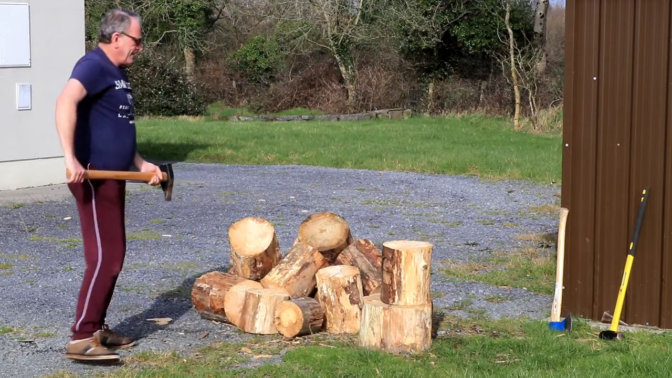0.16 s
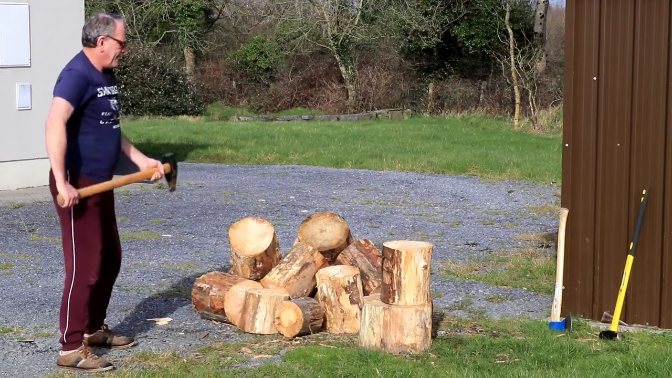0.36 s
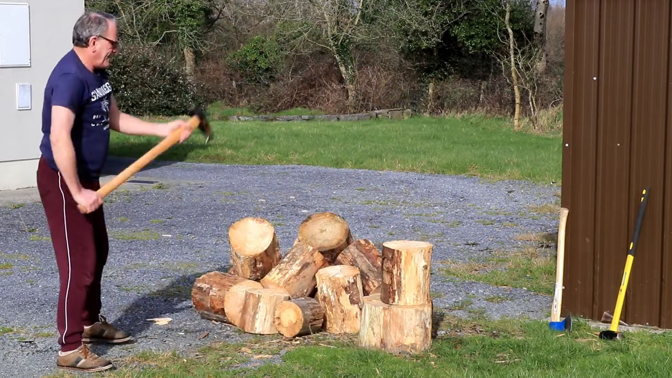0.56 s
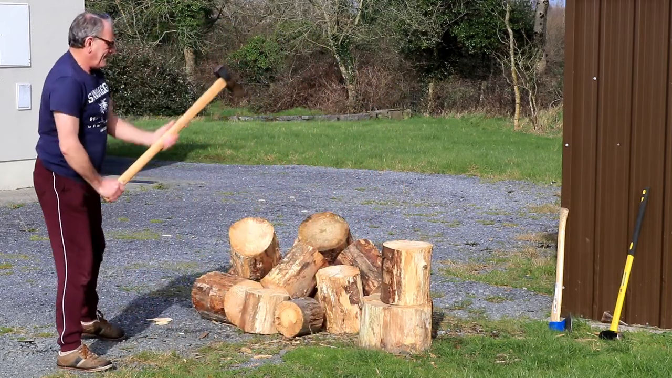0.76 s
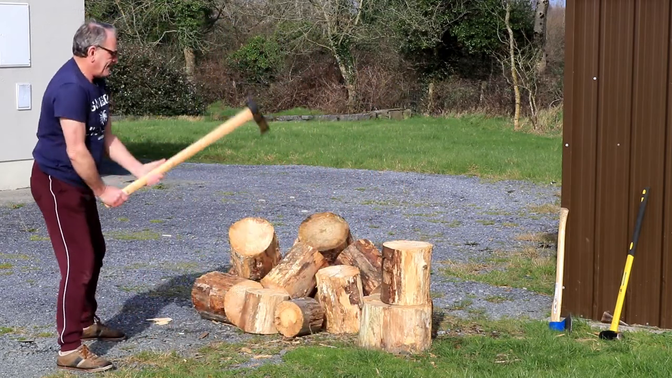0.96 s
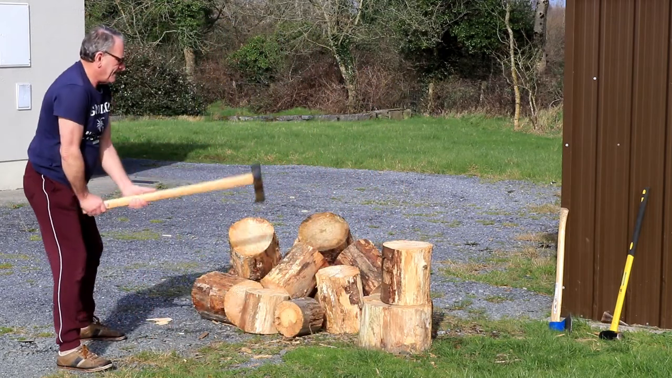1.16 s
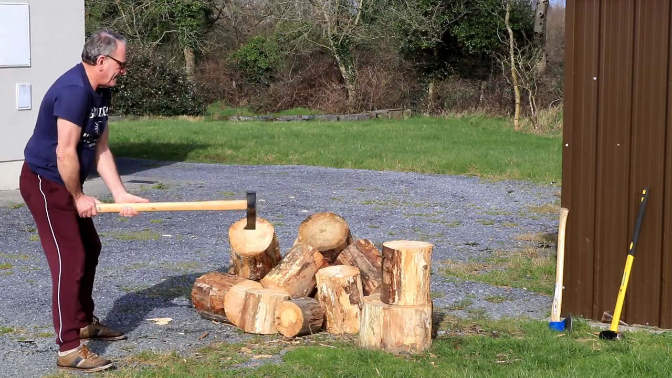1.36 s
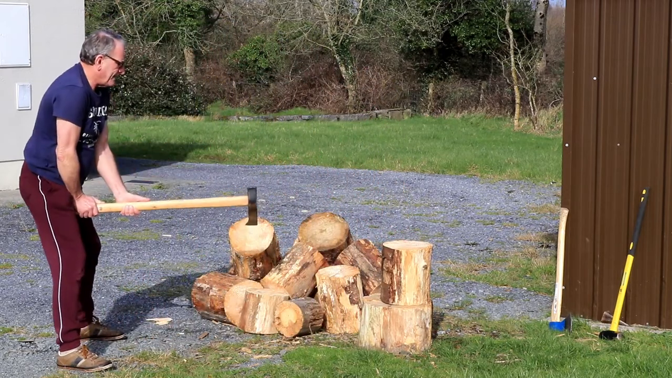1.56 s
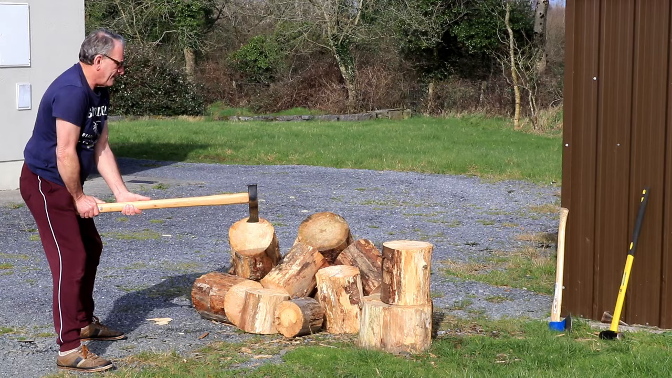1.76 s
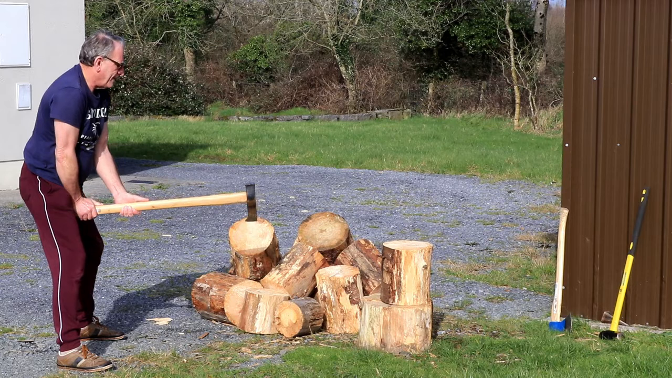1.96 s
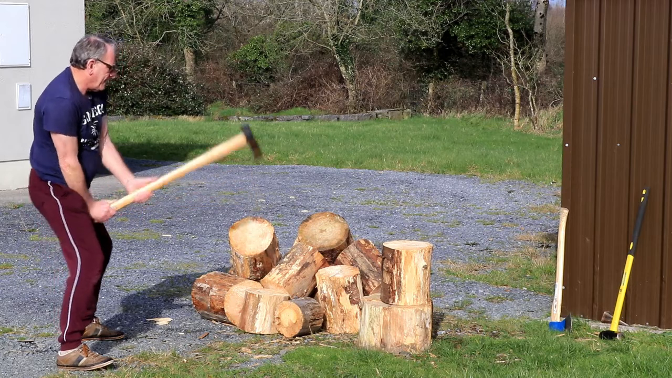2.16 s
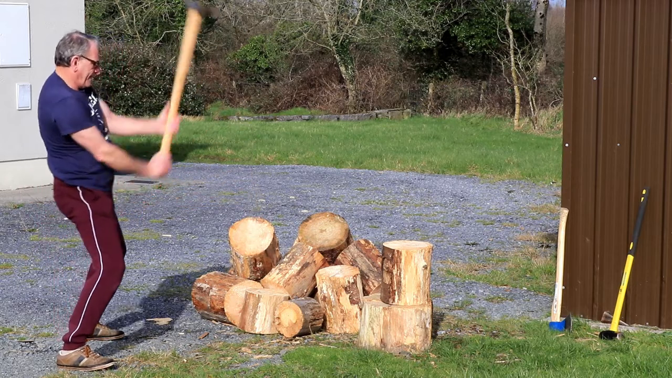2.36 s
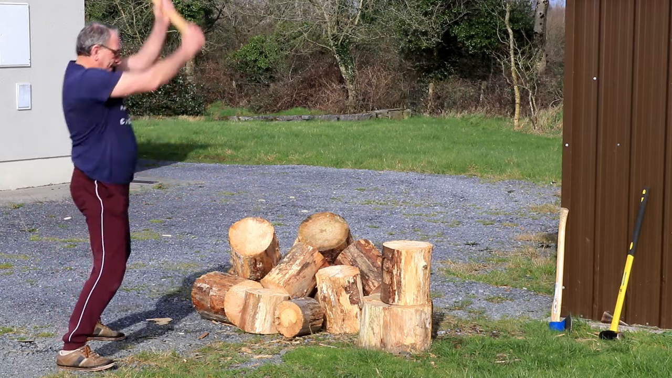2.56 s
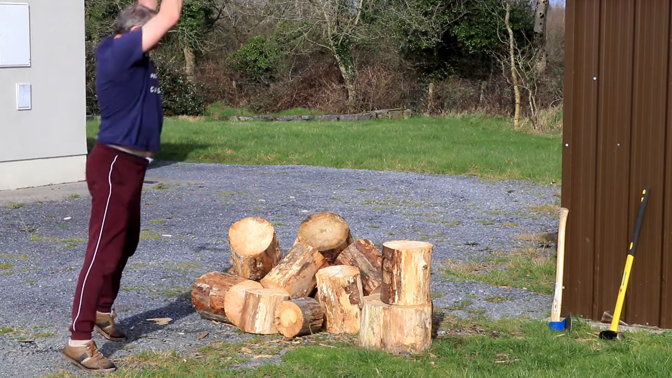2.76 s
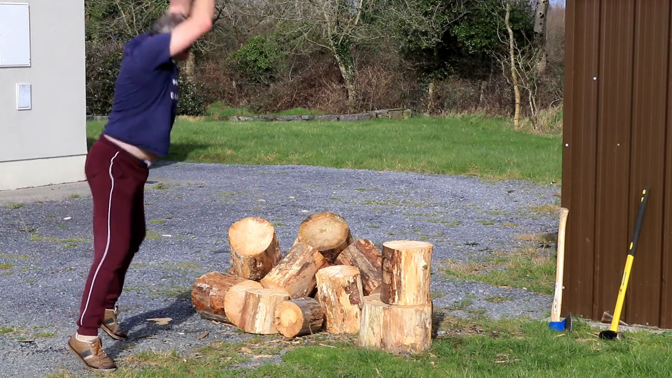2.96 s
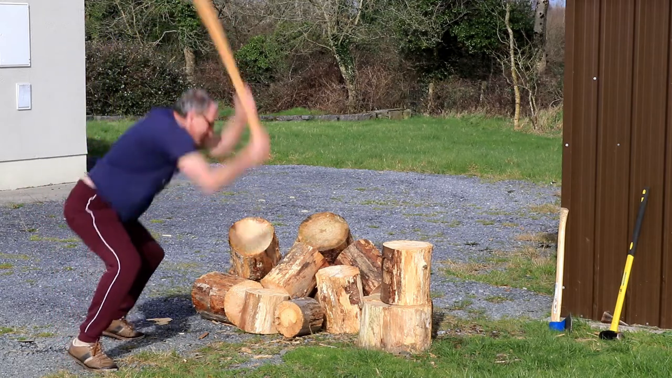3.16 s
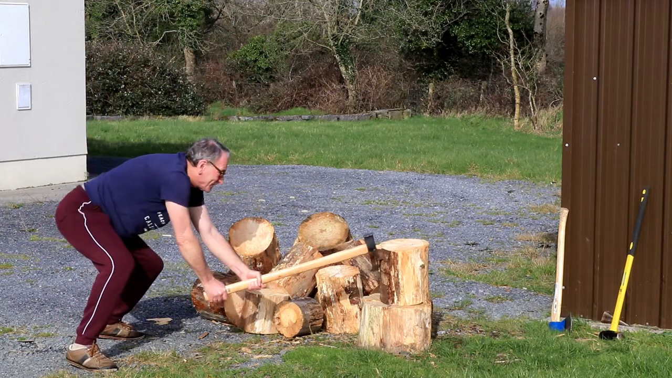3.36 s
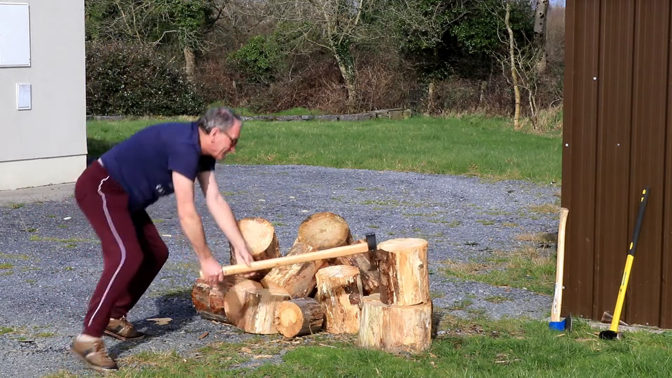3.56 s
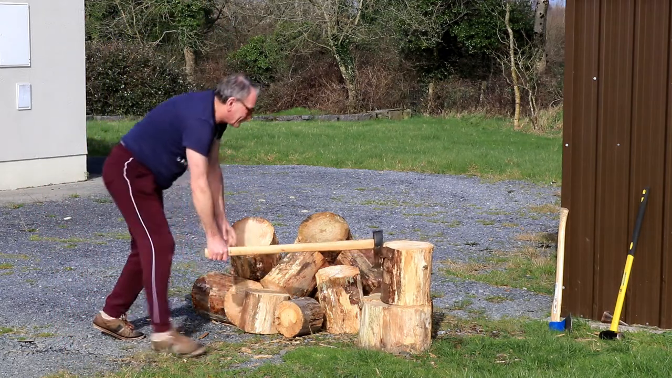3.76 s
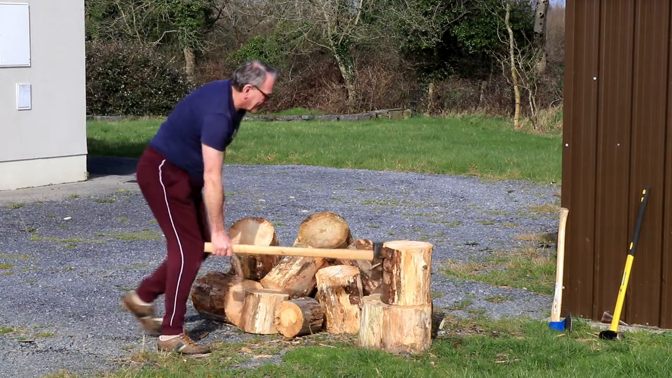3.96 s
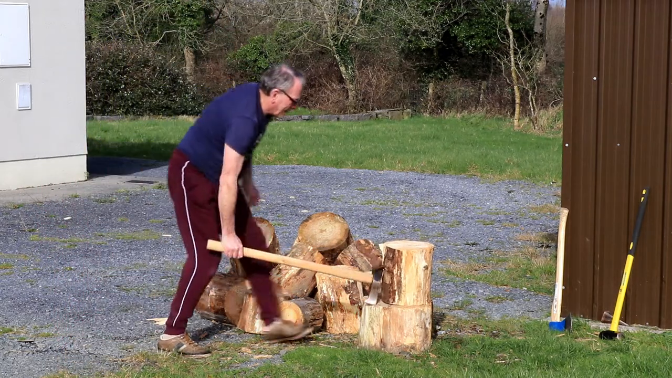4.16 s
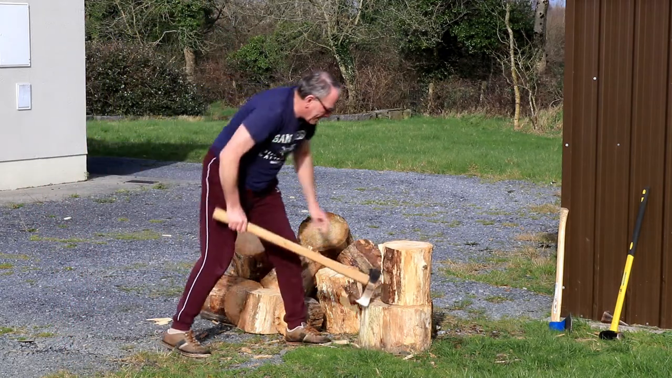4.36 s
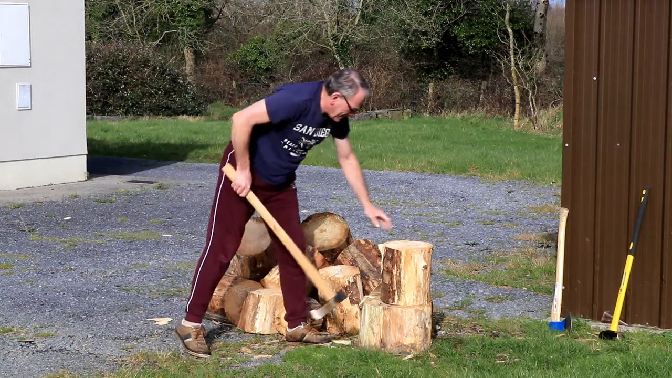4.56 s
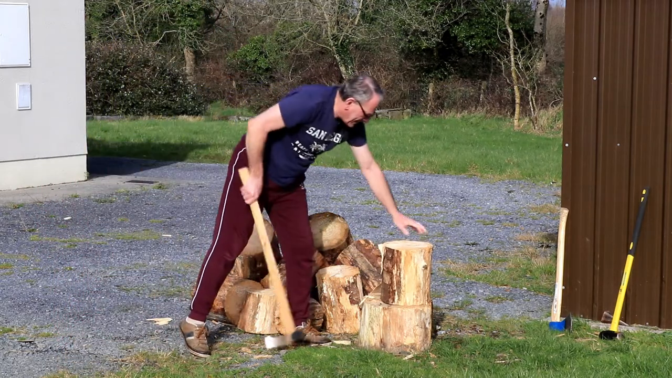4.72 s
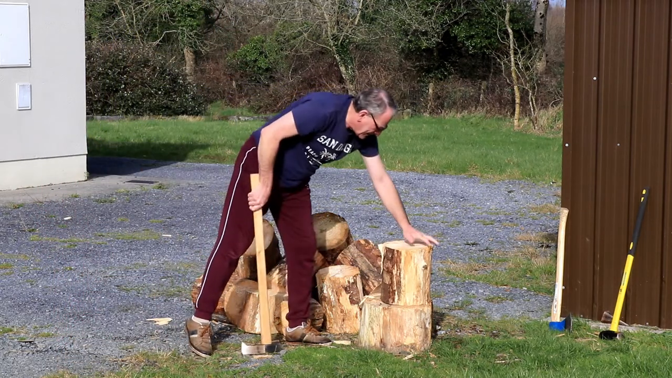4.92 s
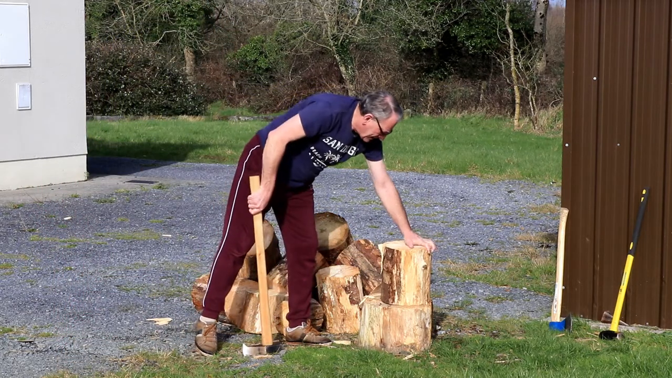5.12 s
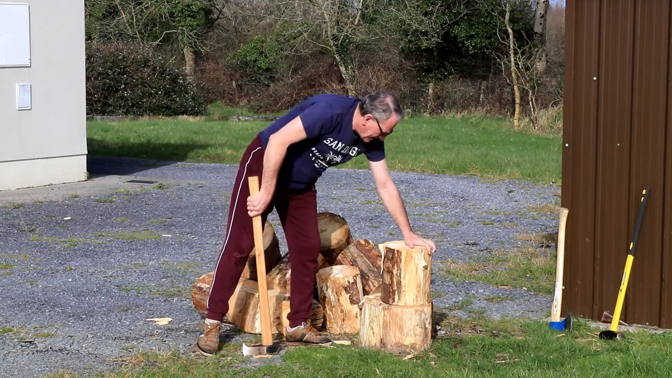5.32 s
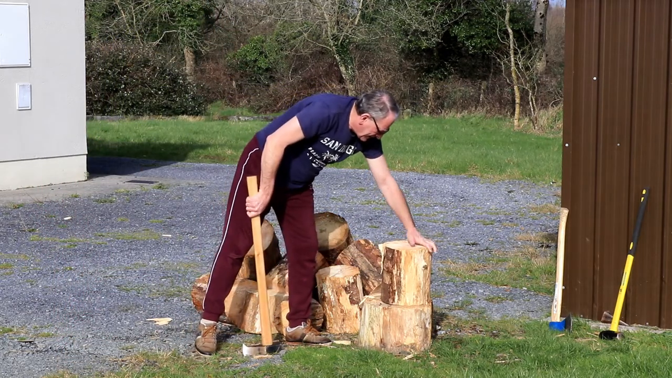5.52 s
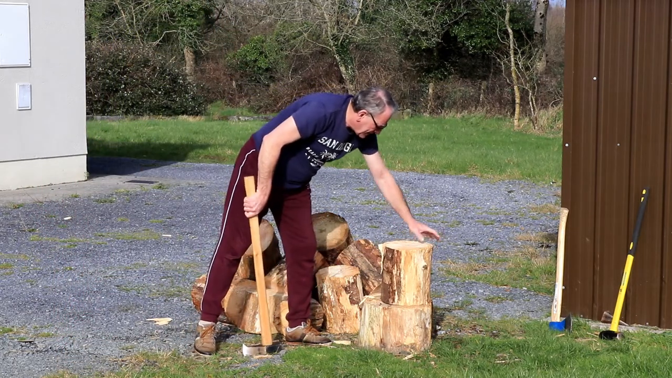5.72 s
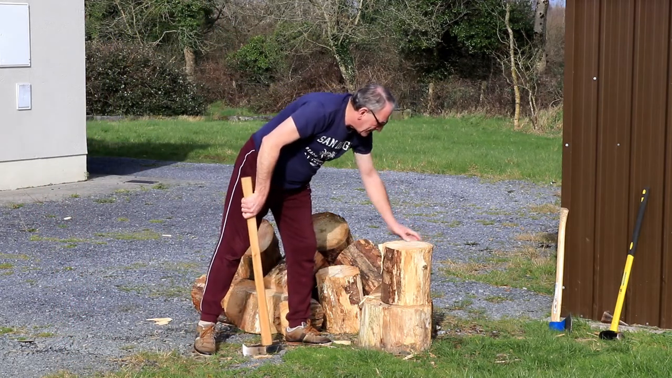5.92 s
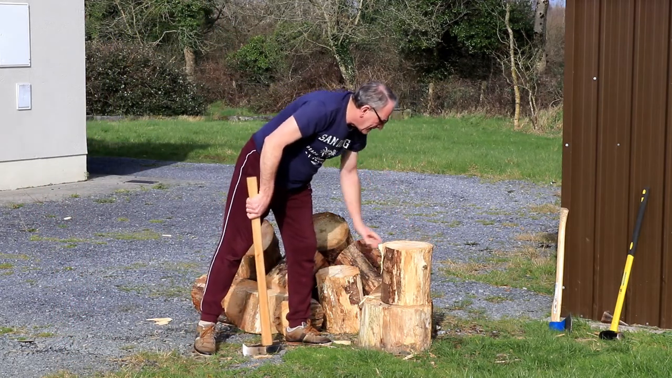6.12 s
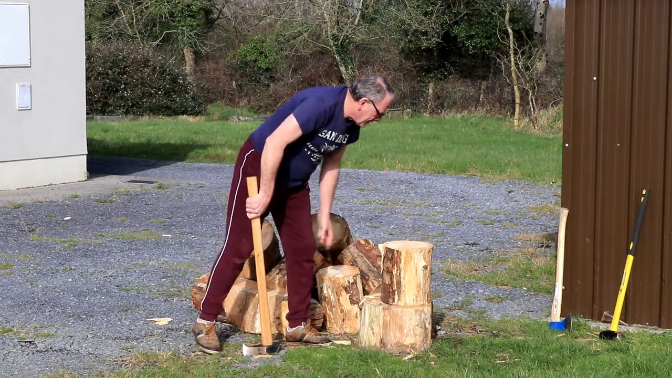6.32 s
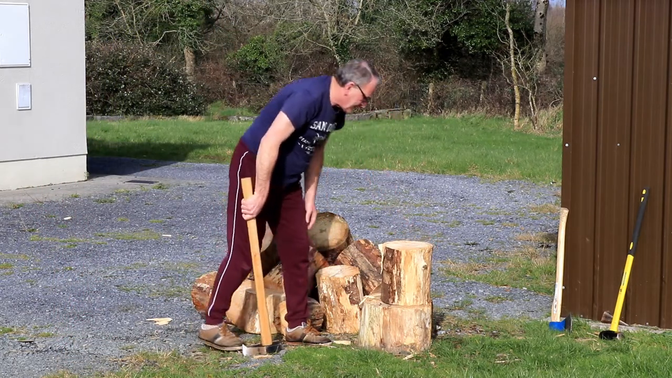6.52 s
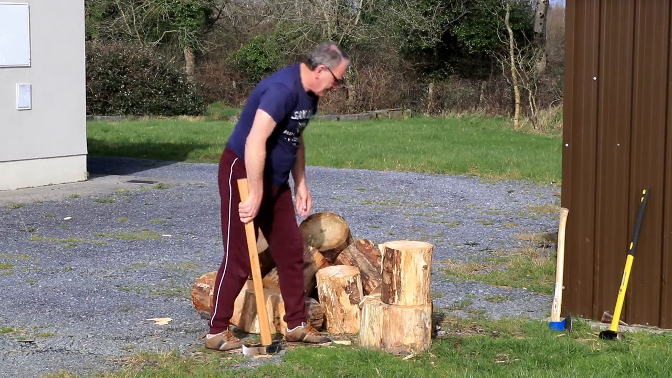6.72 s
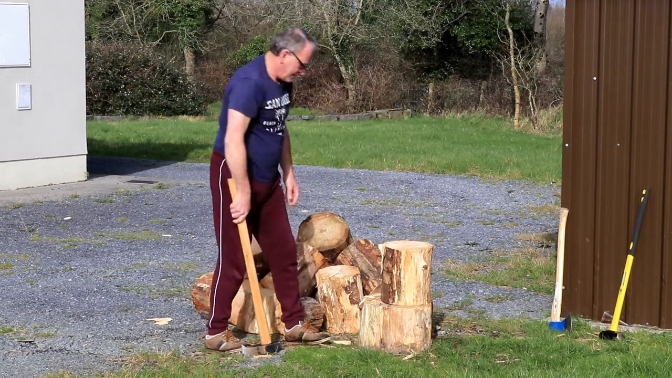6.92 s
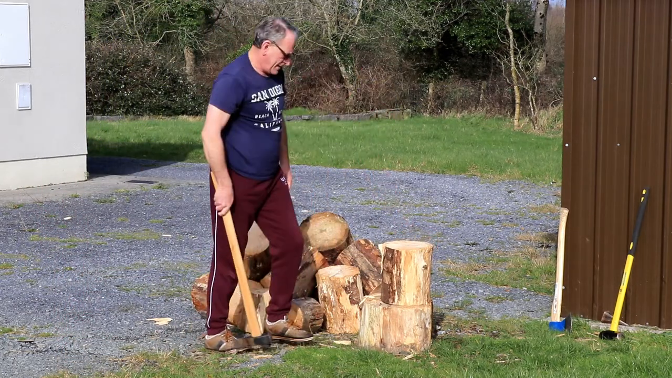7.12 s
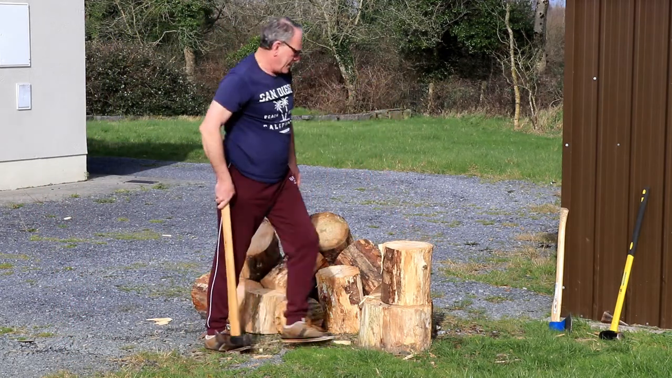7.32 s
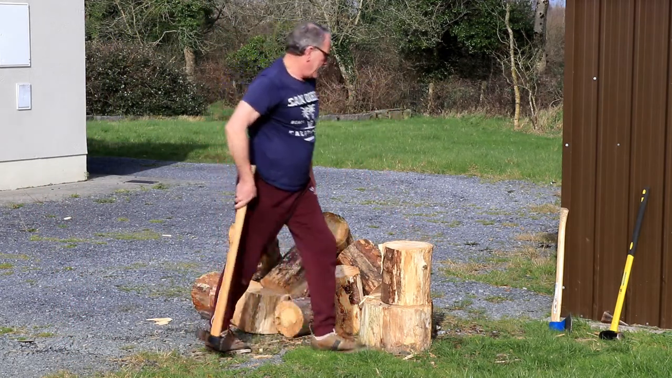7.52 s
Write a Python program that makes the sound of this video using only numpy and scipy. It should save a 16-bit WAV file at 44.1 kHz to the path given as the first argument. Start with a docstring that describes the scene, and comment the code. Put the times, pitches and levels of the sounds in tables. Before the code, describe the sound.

An axe cracks into wood with a thud, followed by knocking split pieces, gravel scuffs and faint birdsong.

```python
"""Splitting wood in a gravel yard

An axe blow tears the fibres, rings the log and thuds into the stack; split pieces tumble, chips click.
Shoes crunch as stones knock together. The steel head is set down on them and rings.
Small birds whistle and trill in a hedge, far traffic hums, three gusts bump the microphone."""
import sys
import numpy as np
from scipy import signal
from scipy.fft import rfft, irfft, next_fast_len
from scipy.io import wavfile
from scipy.ndimage import uniform_filter1d

SR = 44100
rng = np.random.default_rng(int(sys.argv[2]) if len(sys.argv) > 2 else 0)


def int16_out(signal):
    """Quantize to a 16-bit WAV file."""
    q = np.round(np.clip(np.atleast_2d(signal).T, -1, 1) * 32767)
    wavfile.write(sys.argv[1], SR, q.astype(np.int16))


N = 339129

# knocks on wood, the row at 3.43 s a slap returning from a wall: t/s, level/dB, rise/s, tear/s, crack re
# log/dB, thud re log/dB, ear difference/0-1
KNOCKS = [(3.392, -26, 0.0042, 0.0055, 0, -1.5, 0.18), (3.3971, -43, 0.00024, 0.0014, 16, -1, 0.2),
          (3.404, -38.5, .001, 0.0022, 3.5, -4.5, 0.2), (3.41, -44.5, .002, .007, -2.5, -9.5, .3),
          (3.4305, -37, 0.003, 0.007, -3, -10, .6), (3.55, -56, 0.00035, 0.0031, 13, -4, 0.2),
          (3.554, -56.5, 0.0005, 0.0088, 3, -14, 0.2)]
# modes of the log, and of stack and ground: f/Hz, level/dB, t60/s
LOG_MODES = [(635, 2, .04), (855, 8, 0.04), (1410, 13.5, 0.018), (1830, 7.5, 0.022), (2100, 1, 0.03),
             (2310, 0.5, 0.031), (3080, -0.5, 0.045), (3600, 5, 0.02), (6440, -0.5, 0.026),
             (7740, -1, 0.033)]
STACK_MODES = [(59.1, -10.5, 0.22), (106.2, -6, .12), (136, 2.5, 0.098), (161.4, 1, 0.068),
               (221.6, -3.5, 0.037), (290, 3.5, 0.039), (350, 9.5, 0.036)]
# spectra of the crack and of the difference between the ears: f/Hz, level/dB
CRACK_SPECTRUM = [(180, -44), (300, -3), (1020, -11), (1600, 0.5), (2770, -5), (3610, -9), (6450, -12.5),
                  (10400, -24), (13600, -27.5), (15800, -37.5)]
EAR_DIFFERENCE = [(200, -22.5), (700, -1), (2200, 2), (5000, 5.5), (15000, 10)]
# balance of the blow: f/Hz, left-right/dB
BLOW_PAN = [(60, 1), (700, 1), (1290, -1), (2380, 1), (4400, 0.5), (8120, 2.5), (15000, -10)]

def axe_blow(push_s=0.00011, thud_rise_cycles=2.6):
    """Fibres tear in a burst that rings the log; the push of the blade thuds into the stack."""
    out, t = np.zeros((2, N)), np.arange(SR // 3) / SR
    push = t / push_s * np.exp(-t / push_s)
    stack = sum((1 - np.exp(-t * hz / thud_rise_cycles)) * ring([(hz, db, t60_s)], t)
                for hz, db, t60_s in STACK_MODES)
    thud = signal.fftconvolve(push, stack)[:len(t)]
    for start_s, db, rise_s, tear_s, crack_db, thud_db, apart in KNOCKS:
        burst = (1 - np.exp(-t / rise_s)) * np.exp(-t / tear_s)
        fibres, grit = rng.standard_normal((2, 3, len(t)))  # rows: shared, left, right
        fibres = fibres[0] + apart * colour(fibres[1:], EAR_DIFFERENCE)
        grit = grit[0] + 2 * apart * colour(grit[1:], EAR_DIFFERENCE)
        snaps = burst * fibres * gain_of(1.04 * rng.exponential(1, len(t)))
        # the opening split shifts the modes
        modes = [(hz * rng.uniform(0.95, 1.02), *rest) for hz, *rest in LOG_MODES]
        log = signal.fftconvolve(snaps, ring(modes, t)[None], axes=1)[:, :len(t)]
        crack = colour(grit, CRACK_SPECTRUM) * burst
        for part, part_db in (log, 0), (crack, crack_db), (thud, thud_db):
            add(out, start_s, gain_of(db + part_db) * part / part[..., :660].std())  # over first 15 ms
    size = next_fast_len(N)
    pan = gain_of(np.outer([.5, -.5], curve_at(BLOW_PAN, np.fft.rfftfreq(size, 1 / SR))))
    return irfft(rfft(out, size) * pan, size)[:, :N]

# split pieces hitting the pile: t/s, level/dB, f/Hz
BILLET_HITS = [(3.719, -36.5, 567), (3.755, -34.5, 335), (3.785, -34.5, 610), (3.799, -43, 700),
               (3.874, -43, 673), (3.893, -34, 800)]

def billets(rise_s=0.00047):
    """A soft contact rings a short billet at its pitch and one overtone."""
    out, t = np.zeros(N), np.arange(SR // 10) / SR
    attack = 1 - np.exp(-t / rise_s)
    for start_s, db, hz in BILLET_HITS:
        add(out, start_s, attack * ring([(hz, db, .022), (1.64 * hz, db - 13, .015)], t))
    return out

# single stones and chips, the row at 3.3921 s the bright tick opening the axe crack: t/s, level/dB, f/Hz
CLICKS = [(0.322, -45, 880), (1.05, -38, 845), (1.251, -45.5, 1490), (1.284, -44, 4200), (2.148, -45, 1345),
          (2.2573, -40.5, 1410), (2.4072, -44.5, 970), (2.5725, -40.5, 1210), (2.598, -45, 1290),
          (2.704, -40, 1370), (2.717, -40.5, 1450), (2.7502, -40.5, 1500), (2.785, -46, 1740),
          (2.888, -43, 3670), (3.0755, -40, 1600), (3.093, -35, 1720), (3.1568, -39, 1590),
          (3.186, -34, 1390), (3.229, -39, 1975), (3.254, -42, 3600), (3.308, -41.5, 2920),
          (3.3921, -17, 3300), (3.571, -29.5, 3140), (3.5864, -36, 4600), (3.949, -22.5, 3980),
          (3.96, -38.5, 1320), (3.979, -40, 2200), (3.986, -37, 5500), (4.0825, -32.5, 4300),
          (4.1197, -31.5, 3130), (4.142, -39, 1510), (4.1495, -33, 7450), (4.153, -28, 3730),
          (4.3167, -35.5, 1940), (4.374, -38.5, 6550), (4.411, -42, 7700), (4.421, -43, 1090),
          (4.465, -42.5, 7800), (4.47, -37, 1670), (4.556, -31, 1840), (4.8777, -32.5, 3750),
          (4.883, -36, 3300), (4.909, -34, 3700), (4.929, -41, 5000), (5.037, -47, 4000),
          (5.051, -42.5, 5600), (6.126, -45, 2200)]

def clicks(contacts=4):
    """A stone or chip skids through quick dry contacts, each a cycle or two with an overtone."""
    out, t = np.zeros((2, N)), np.arange(900) / SR
    for start_s, db, hz in CLICKS:
        for k, (wait, shift, size, side) in enumerate(rng.random((contacts, 4))):
            later = k > 0
            cycles = t * hz * (1 + later * (shift - .35))
            lag = later * (0.27 + wait)
            tone = np.exp(-cycles / 1.14) * np.sin(2 * np.pi * cycles)
            overtone = 0.15 * np.exp(-cycles / 0.73) * np.sin(2 * np.pi * (1.5 + size) * cycles)
            attack = (1 - np.exp(-6 * cycles)) ** 2
            pan_db = 4.5 * np.array([[side - .5], [.5 - side]])
            gain = gain_of(db - later * 4.4 * size - 8.4 * lag + pan_db)
            add(out, start_s + .0028 * lag, gain * attack * (tone + overtone))
    return out

# shoes and axe head scuffing: t/s, length/s, level/dB, treble tilt/dB, bass tilt/dB
SCUFFS = [(0.296, 0.089, -65, -22, 3), (0.84, 0.085, -69.5, 6, 2.5), (0.98, 0.115, -56.5, -50, -3),
          (1.272, 0.016, -61.5, -5, -0.5), (2.44, 0.39, -63.5, -17, -2.5), (3.142, 0.086, -46.5, -13, -2),
          (3.293, 0.045, -59, -14, -35), (3.632, 0.078, -66, 1, 3), (4.012, 0.17, -55, -0.5, -15),
          (4.246, 0.09, -54.5, -5.5, -2), (4.33, 0.14, -63.5, -4, -4), (4.99, 0.081, -68.5, 6, -10),
          (5.093, 0.076, -66.5, 5, 5), (5.509, 0.029, -65, -9, 0.5), (6.096, 0.035, -62.5, -3.5, -31.5),
          (7.472, 0.137, -70.5, -1, 1.5)]
# heels, billets and axe head landing: t/s, slide/s, settle/s, level/dB, treble tilt/dB, bass tilt/dB
LANDINGS = [(3.075, .13, 0.027, -52, -39, -9.5), (3.426, 0.0124, 0.068, -48, -2, -2.5),
            (3.549, 0.031, 0.066, -59.5, 1, -46), (3.717, 0.048, 0.0132, -57.5, 20.5, 5.5),
            (3.772, 0.021, 0.1, -66, 14, 9.5), (3.868, 0.027, 0.033, -52.5, 9, 2.5),
            (3.944, 0.059, 0.054, -56.5, 2.5, -22), (4.871, 0.055, 0.02, -56, 10, -12)]

def gravel(stone_sizes=18, landing_rise_s=0.0047, ring_cycles=.85):
    """Pushed stones of many sizes click densely against each other, in clumps."""
    out, t = np.zeros((2, N)), np.arange(N) / SR
    strokes = [(start_s, .53 * length_s, .47 * length_s, .46 * length_s, *levels_db)
               for start_s, length_s, *levels_db in SCUFFS]
    strokes += [(start_s, landing_rise_s, *rest) for start_s, *rest in LANDINGS]
    drags = []
    for start_s, rise_s, hold_s, fade_s, *levels_db in strokes:
        span = slice(round(start_s * SR), round((start_s + rise_s + hold_s + 6 * fade_s) * SR))
        age_s = t[span] - start_s
        envelope = np.clip(age_s / rise_s, 0, 1) * np.exp(-np.maximum(age_s - rise_s - hold_s, 0) / fade_s)
        drags.append((span, envelope, *levels_db))
    clumps = gain_of(2 * wander(N, 300))
    drift = gain_of(3.5 * wander(N, 1200))  # shifted per size: now large stones lead, now small
    for hz in np.geomspace(250, 14000, stone_sizes):
        treble = np.clip(np.log2(hz / 2000) / 3.38, 0, 1)
        bass = np.clip(np.log2(1100 / hz), 0, 1)
        power = np.zeros(N)
        for span, envelope, db, treble_db, bass_db in drags:
            power[span] += (envelope * gain_of(db + treble * treble_db + bass * bass_db)) ** 2
        cycles = hz * t[:600]
        stone = t[:600] * np.exp(-cycles / ring_cycles) * np.sin(2 * np.pi * cycles)
        hits_per_s = 450 + hz / 6
        at = rng.integers(0, N, int(hits_per_s * N / SR))
        force = gain_of(2.44 * np.minimum(rng.exponential(1, len(at)), 3))
        force *= clumps[at] * np.roll(drift, rng.integers(N))[at]
        hits = np.zeros((2, N))
        hits[:, at] = force * rng.uniform(0.073, 1, (2, len(at)))
        crunch = unit_rms(signal.oaconvolve(hits, stone[None], axes=1)[:, :N])
        size_db = -10 - 7.2 * np.log2(hz / 2400) * treble
        out += gain_of(size_db) * np.sqrt(power) * crunch
    return out

# steel head modes: f/Hz, level/dB, t60/s
HEAD_MODES = [(1930, -7, .16), (6293, -4, .13), (6321, 1, .19), (8292, -6, .08), (8353, -6, .2),
              (10720, -9, .1), (13040, -14, .08)]
# head touching stones: t/s, level/dB
HEAD_TAPS = [(4.878, -68), (4.8915, -52), (4.927, -56), (5.003, -70), (5.049, -73)]

def axe_head(spread_db=1.5):
    """The steel rings at each touch, its modes stirred in varying shares."""
    out, t = np.zeros(N), np.arange(SR // 3) / SR
    for start_s, tap_db in HEAD_TAPS:
        modes = [(hz, db + rng.uniform(-spread_db, spread_db), t60_s) for hz, db, t60_s in HEAD_MODES]
        add(out, start_s, gain_of(tap_db) * ring(modes, t))
    return out

# gusts: t/s, level/dB, left-right/dB
GUSTS = [(0.358, -34.5, -25), (1.419, -43, -21), (1.917, -44, -23)]

def wind_bumps(hz=75):
    """Gusts push the microphone membranes, the right more than the left."""
    out, t = np.zeros((2, N)), np.arange(SR // 8) / SR
    bump = t / 0.024 * np.exp(1 - t / 0.0061) * np.sin(2 * np.pi * hz * t)
    for start_s, db, pan_db in GUSTS:
        add(out, start_s, gain_of(db + pan_db * np.array([[.5], [-.5]])) * bump)
    return out

# clear and trilled bird notes: t/s, length/s, first f/Hz, last f/Hz, level/dB
WHISTLES = [(0, 0.12, 3870, 3730, -77), (0.17, 0.077, 3790, 3750, -74.5), (0.307, 0.048, 4130, 3480, -71),
            (0.355, 0.076, 3380, 3830, -70), (0.674, 0.018, 4000, 3530, -66.5),
            (2.543, 0.09, 3720, 3790, -81), (2.645, 0.115, 3670, 3580, -72.5),
            (4.677, 0.18, 3610, 3546, -73), (6.06, 0.087, 3659, 3570, -75.5),
            (1.711, .025, 4400, 3100, -72.5), (6.135, .035, 4800, 4200, -75),
            (6.025, 0.029, 3200, 2600, -75), (5.819, 0.053, 4320, 4720, -77),
            (5.933, 0.027, 4220, 3310, -69.5), (6.197, .05, 4000, 3770, -76),
            (6.247, 0.073, 3800, 3080, -74), (6.31, 0.065, 3330, 3750, -68),
            (6.575, 0.039, 3410, 4040, -72), (6.69, .022, 4300, 4150, -72), (6.727, 0.062, 3750, 3960, -69),
            (6.81, .04, 3824, 3100, -77), (7.068, 0.055, 3750, 3370, -78)]
TRILLS = [(0.64, 0.053, 4456, 4400, -74), (0.721, 0.13, 4050, 3680, -72.5), (0.815, 0.024, 5100, 4885, -74),
          (1.306, 0.017, 4920, 4850, -74), (1.256, 0.21, 3421, 3280, -74), (1.48, 0.08, 3450, 3050, -75),
          (1.634, 0.025, 4730, 3900, -72.5), (1.6, 0.078, 3190, 2730, -76), (1.89, .07, 2690, 3040, -77),
          (2.011, 0.16, 3600, 3100, -73), (2.196, 0.24, 7350, 7150, -81), (2.236, 0.056, 3850, 4160, -70),
          (5.636, 0.1, 2890, 3100, -73)]

def birds(whistle_blur_hz=100, trill_blur_hz=276, chirp_blur_hz=120, flutter_hz=24):
    """Gliding notes, smeared in each ear by many paths through the hedge; trills flutter."""
    out = np.zeros((2, N))
    voices = (WHISTLES, whistle_blur_hz, 0), (TRILLS, trill_blur_hz, .7), (far_chirps(), chirp_blur_hz, 0)
    for notes, blur_hz, flutter_depth in voices:
        for start_s, length_s, first_hz, last_hz, db in notes:
            t = np.arange(0, length_s, 1 / SR)
            phase = 2 * np.pi * np.cumsum(first_hz + (last_hz - first_hz) * t / length_s) / SR
            paths = rng.standard_normal((4, len(t) + 2000))
            for corner_hz in blur_hz / 2, blur_hz:
                paths = signal.lfilter([1], [1, -np.exp(-2 * np.pi * corner_hz / SR)], paths)
            paths = [unit_rms(path[2000:]) for path in paths]
            steady_core = 130 / blur_hz
            flutter = 1 + flutter_depth * np.sin(2 * np.pi * flutter_hz * t)
            envelope = gain_of(db) * flutter * signal.windows.tukey(len(t), .3)
            for ear in range(2):
                note = (paths[ear] + steady_core) * np.cos(phase) + paths[ear + 2] * np.sin(phase)
                add(out[ear], start_s, envelope * unit_rms(note))
    return out

def far_chirps(count=100):
    """Note rows for farther birds: faint, quick, falling chirps at random times."""
    when, length, pitch, glide, loudness = rng.random((count, 5)).T
    first_hz = 2700 + 2200 * pitch
    last_hz = first_hz * (.72 + .2 * glide)
    return zip(when * N / SR, 0.032 + 0.041 * length, first_hz, last_hz, -86.5 + 7 * loudness)

# yard decay: f/Hz, t60/s
YARD_DECAY = [(100, 0.232), (500, 0.051), (2000, 0.21), (8000, 0.18), (15000, 0.076)]

def reflections(sound, t60_scale=1):
    """Scattered echoes from walls and log pile; low mids and top treble die first."""
    taps = np.zeros((2, SR // 2))
    grid = np.arange(100, SR // 2 - 20, 20)
    at = grid + rng.integers(0, 20, (2, len(grid)))
    np.put_along_axis(taps, at, rng.choice([-1., 1.], at.shape), 1)
    hz, t, spectra = signal.stft(taps, SR, nperseg=256)
    t60_s = t60_scale * curve_at(YARD_DECAY, hz)[:, None]
    tail = signal.istft(spectra * gain_of(-60 * t / t60_s), SR, nperseg=256)[1]
    mid = tail.mean(axis=0)
    tail = mid + colour(tail - mid, EAR_DIFFERENCE)
    tail /= np.linalg.norm(tail[0])
    return signal.fftconvolve(sound.mean(axis=0)[None], tail, axes=1)[:, :N]

# traffic and breeze spectrum: f/Hz, level/dB
AIR_SPECTRUM = [(12, -53), (20, -28), (50, 2), (70, -11), (95, 1), (192, -14.5), (345, -18.5), (375, -15),
                (969, -20), (1350, -26.5), (2960, -26.5), (13700, -42.5), (15800, -64.5)]
# likeness of the ears: f/Hz, correlation
AIR_CORRELATION = [(60, 0.99), (240, 0.822), (950, 0.228), (3770, 0.0065), (15000, -0.28)]
# swell of the far rumble: t/s, level/dB
TRAFFIC_SWELL = [(0, 1), (1.5, 0.5), (4.699, 3), (5.5, 2), (7.3, -2), (7.6, 4)]

def traffic_and_breeze(level_db=-58.5, pan_db=0.77, swell_corner_hz=150):
    """Far noise with drifting patches in its spectrum; the bass swells most."""
    frames, hz = N // 256 + 5, np.fft.rfftfreq(1024, 1 / SR)[:, None]
    left_re, left_im, other_re, other_im, patches = rng.standard_normal((frames, 513, 5)).T
    left, other = left_re + 1j * left_im, other_re + 1j * other_im
    likeness = curve_at(AIR_CORRELATION, hz)
    right = likeness * left + np.sqrt(1 - likeness ** 2) * other
    patches_db = 1.1 * unit_rms(uniform_filter1d(uniform_filter1d(patches, 12, axis=0), 14, axis=1))
    passing_db = np.interp(np.arange(frames) * 256 / SR, *np.transpose(TRAFFIC_SWELL))
    swell_db = (passing_db + .5 * wander(frames, 30)) / (1 + hz / swell_corner_hz)
    spectra = np.array([left, right]) * gain_of(curve_at(AIR_SPECTRUM, hz) + patches_db + swell_db)
    noise = signal.istft(spectra, nperseg=1024, noverlap=768)[1][:, :N]
    return gain_of(level_db + pan_db * np.array([[.5], [-.5]])) * unit_rms(noise)

def gain_of(db):
    return 10 ** (np.asarray(db) / 20)

def unit_rms(x):
    return x / np.sqrt(np.mean(x ** 2) + 1e-20)

def wander(count, width):
    """Noise averaged over width points, rms 1."""
    return unit_rms(uniform_filter1d(rng.standard_normal(count), width))

def curve_at(points, hz):
    """Interpolates a table over log frequency."""
    points_hz, values = np.transpose(points)
    return np.interp(np.log(hz + 1), np.log(points_hz + 1), values)

def colour(x, spectrum):
    """Filters by a table of f/Hz, level/dB."""
    size = x.shape[-1]
    return irfft(rfft(x) * gain_of(curve_at(spectrum, np.fft.rfftfreq(size, 1 / SR))), size)

def ring(modes, t):
    """Sum of decaying sines."""
    return sum(gain_of(db - 60 * t / t60_s) * np.sin(2 * np.pi * hz * t) for hz, db, t60_s in modes)

def add(mix, start_s, sound):
    """Mixes in a mono or stereo sound."""
    part = mix[..., round(start_s * SR):][..., :sound.shape[-1]]
    part += sound[..., :part.shape[-1]]

def scene(near_echo_db=-10.5, bird_echo_db=2.5):
    """Near sounds, birds and their echoes over wind and traffic; far birds arrive mostly reflected."""
    near = axe_blow() + clicks() + axe_head() + billets() + gravel()
    song = birds()
    echoes = gain_of(near_echo_db) * reflections(near)
    echoes += gain_of(bird_echo_db) * reflections(song, t60_scale=3)
    return near + song + echoes + wind_bumps() + traffic_and_breeze()

def record(dry, low_cut_hz=42, band_limit_hz=16100):
    """Microphone low cut, then band limit."""
    highpass = signal.butter(3, low_cut_hz, "highpass", fs=SR, output="sos")
    lowpass = signal.firwin(511, band_limit_hz, window=("kaiser", 9), fs=SR)
    return signal.oaconvolve(signal.sosfilt(highpass, dry), lowpass[None], "same")

dry = scene()
out = record(dry)
int16_out(out)
```